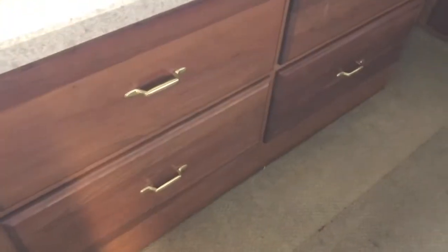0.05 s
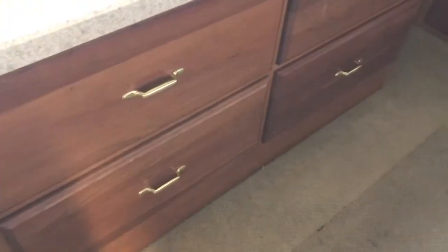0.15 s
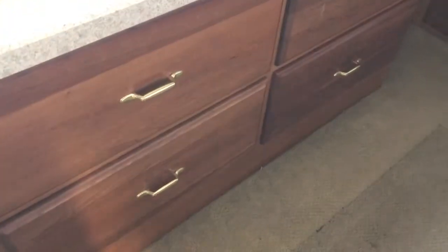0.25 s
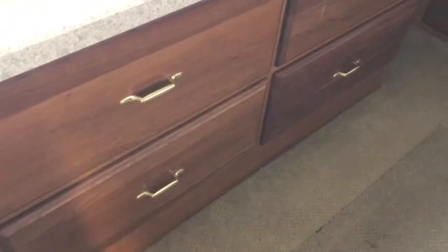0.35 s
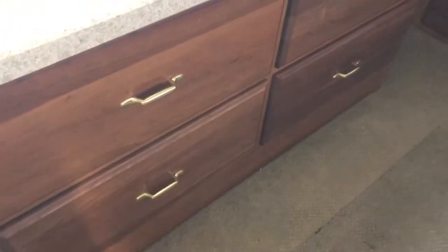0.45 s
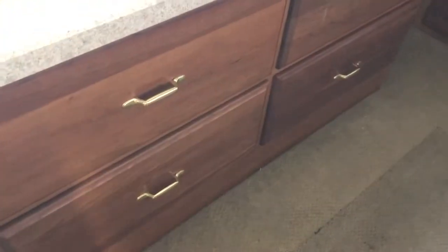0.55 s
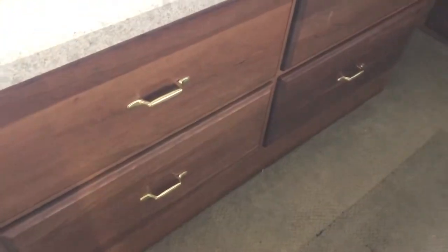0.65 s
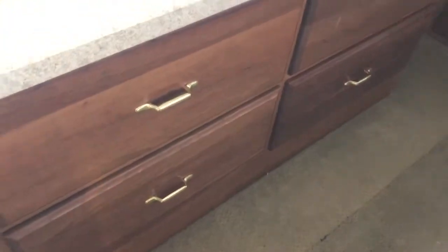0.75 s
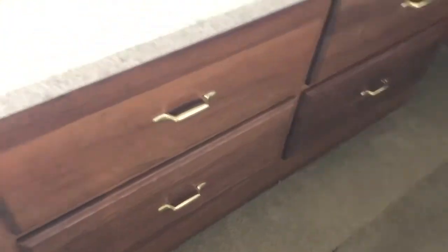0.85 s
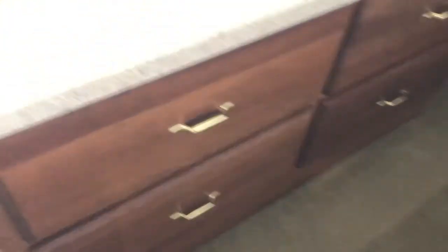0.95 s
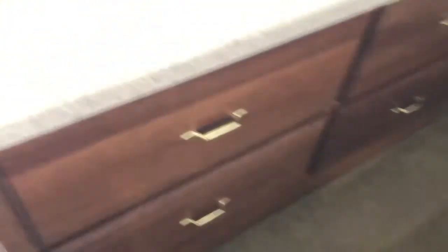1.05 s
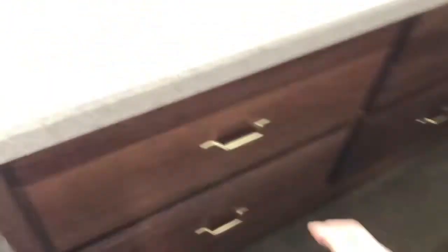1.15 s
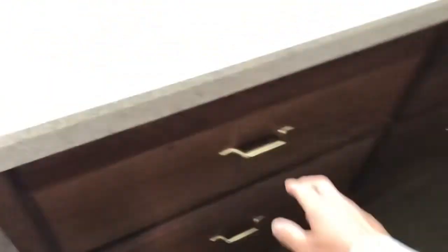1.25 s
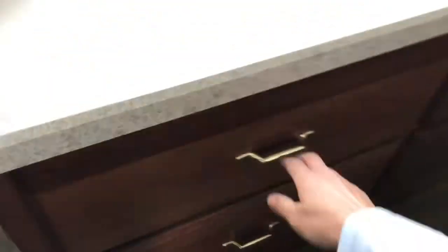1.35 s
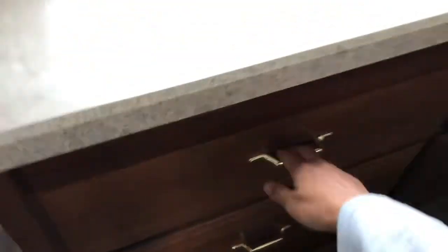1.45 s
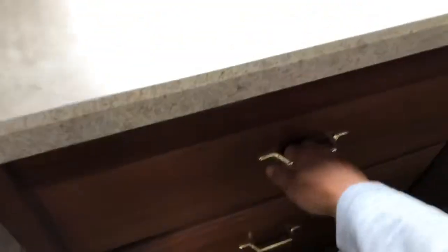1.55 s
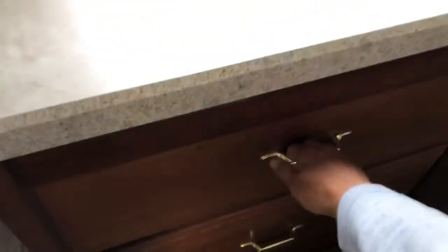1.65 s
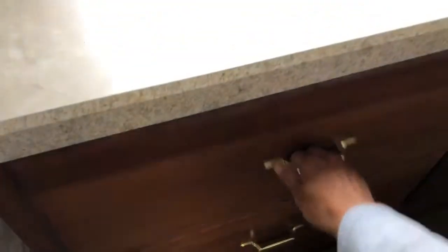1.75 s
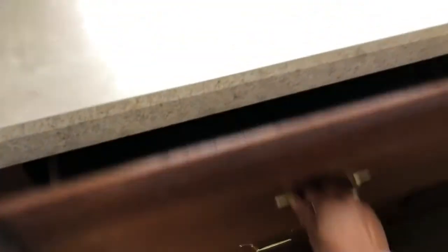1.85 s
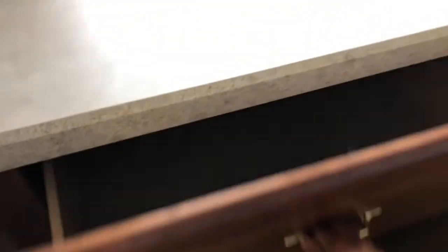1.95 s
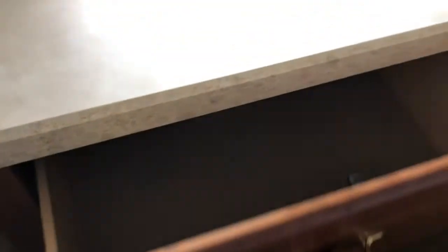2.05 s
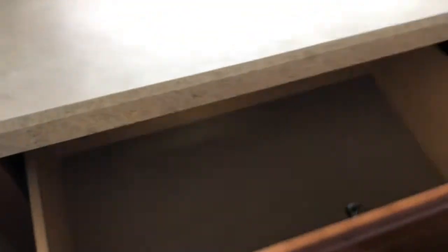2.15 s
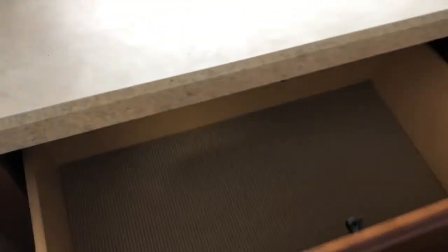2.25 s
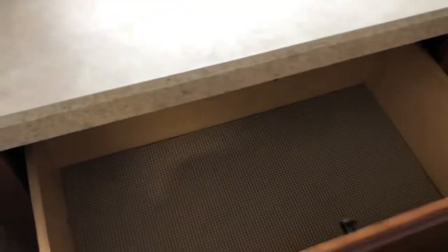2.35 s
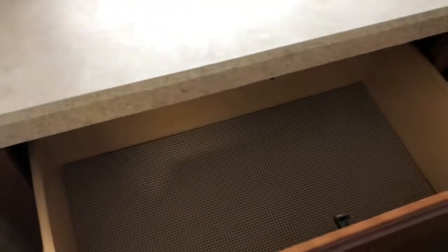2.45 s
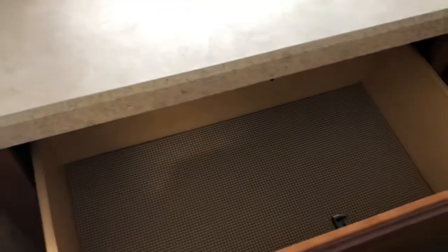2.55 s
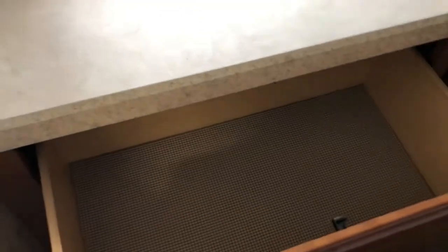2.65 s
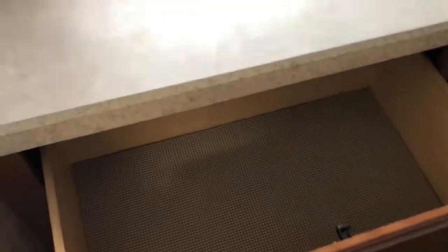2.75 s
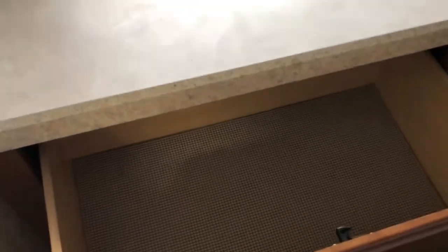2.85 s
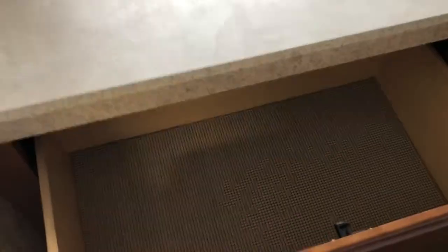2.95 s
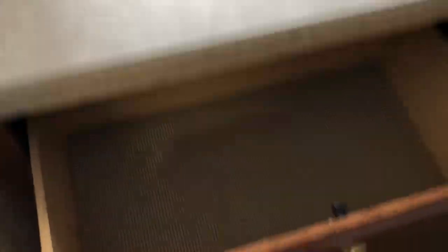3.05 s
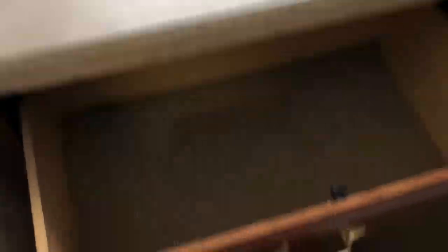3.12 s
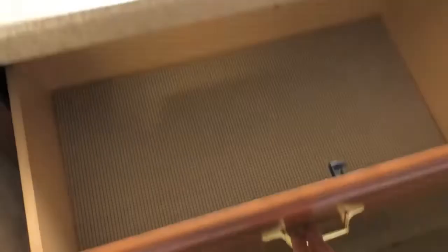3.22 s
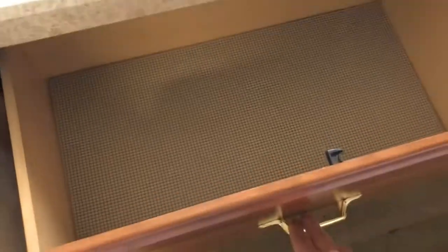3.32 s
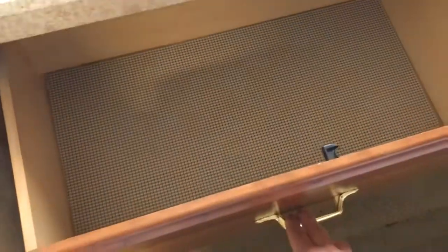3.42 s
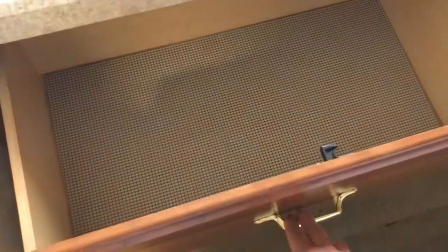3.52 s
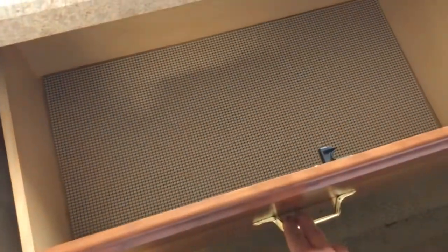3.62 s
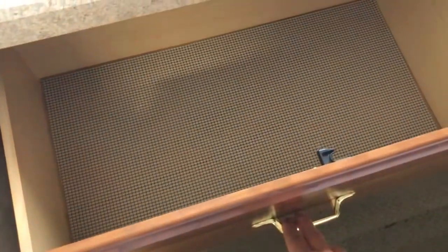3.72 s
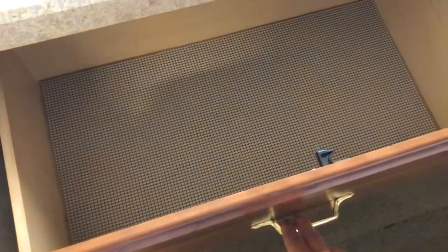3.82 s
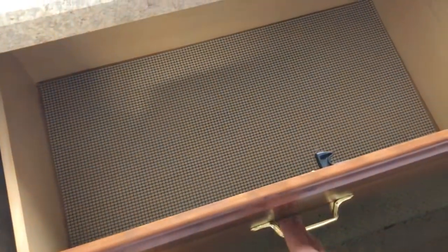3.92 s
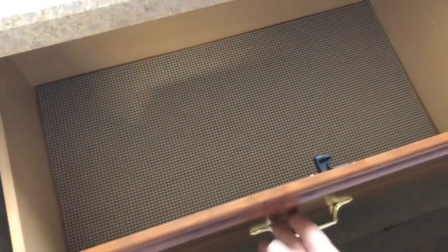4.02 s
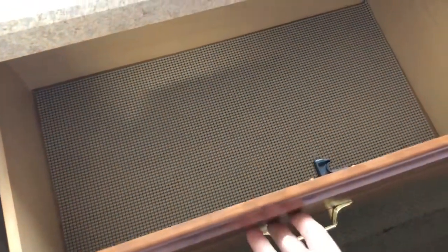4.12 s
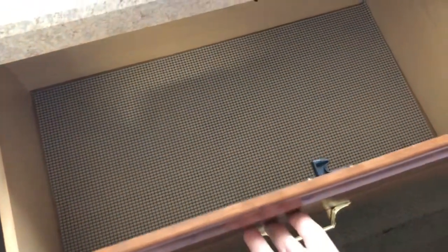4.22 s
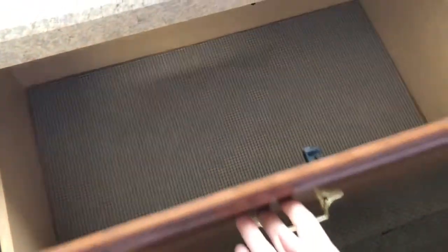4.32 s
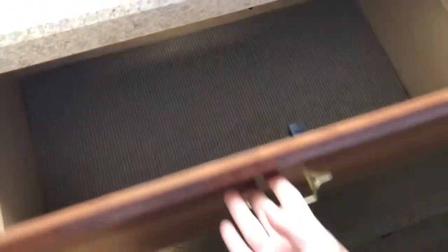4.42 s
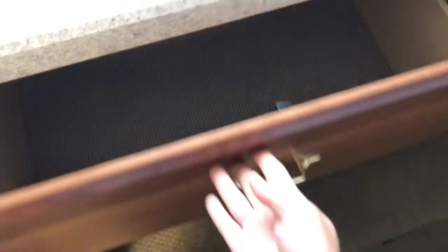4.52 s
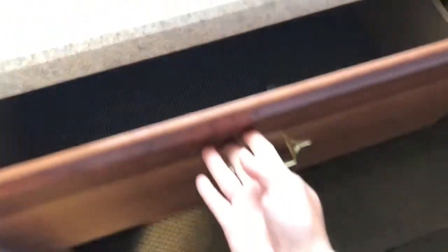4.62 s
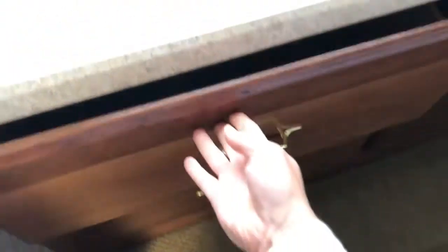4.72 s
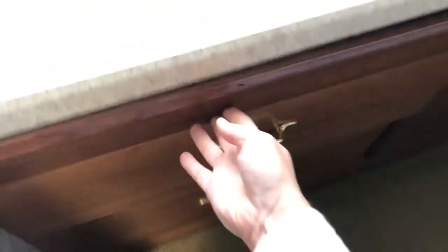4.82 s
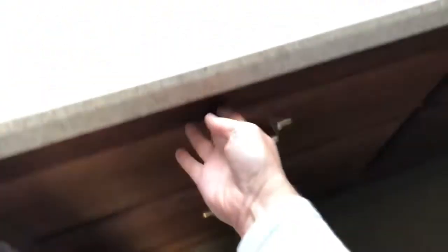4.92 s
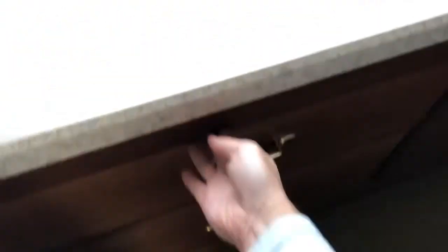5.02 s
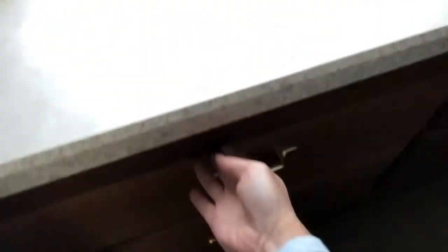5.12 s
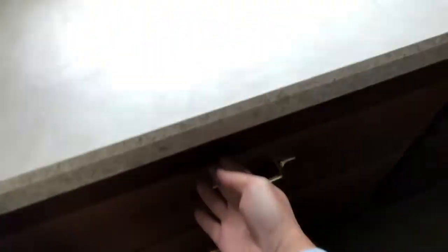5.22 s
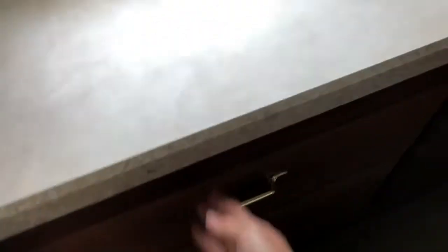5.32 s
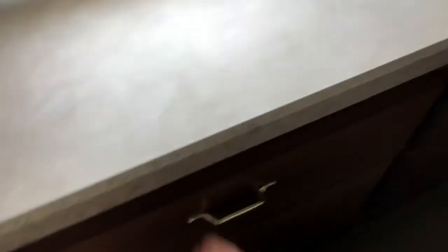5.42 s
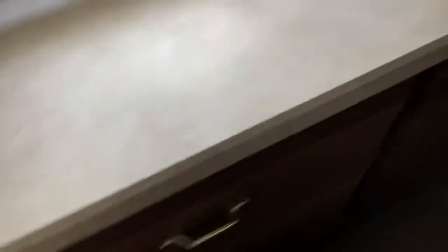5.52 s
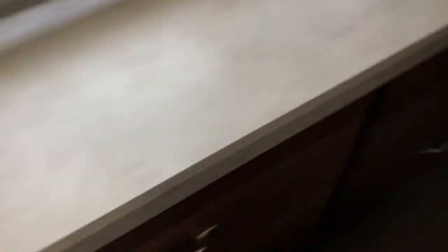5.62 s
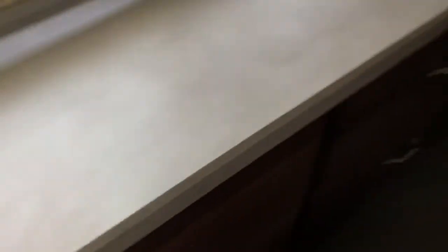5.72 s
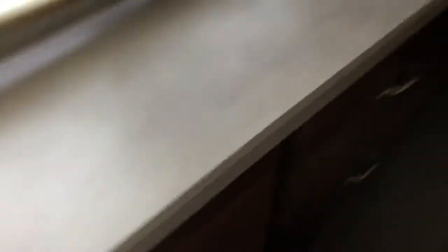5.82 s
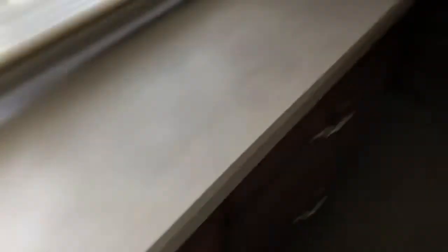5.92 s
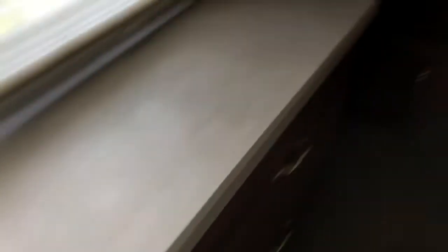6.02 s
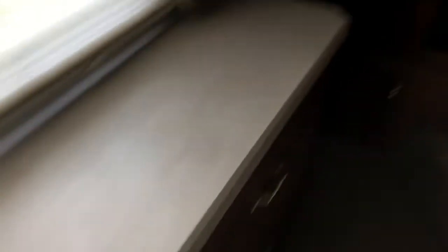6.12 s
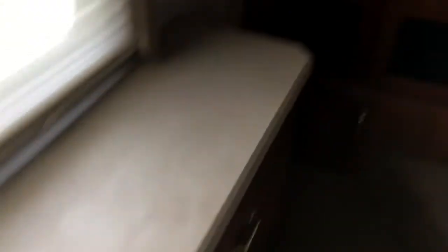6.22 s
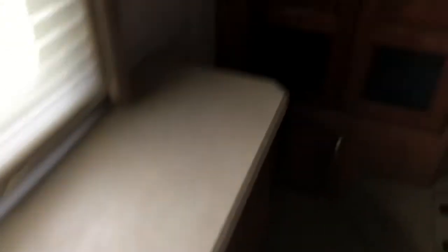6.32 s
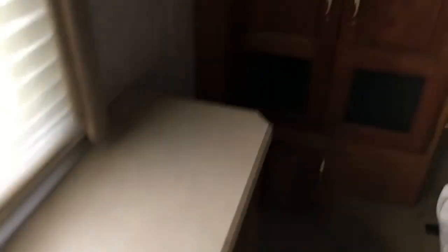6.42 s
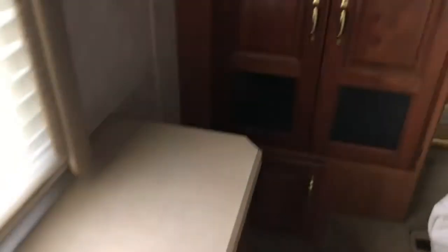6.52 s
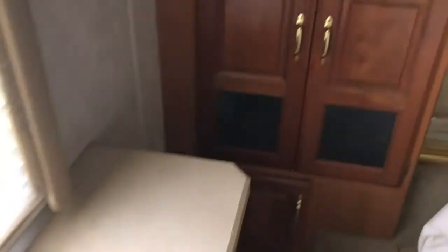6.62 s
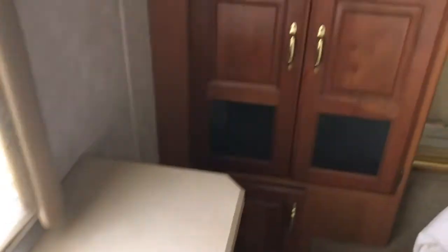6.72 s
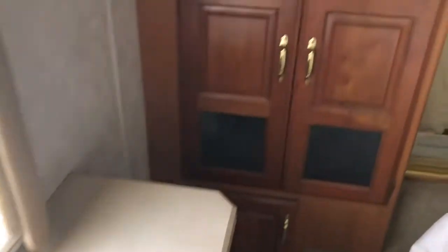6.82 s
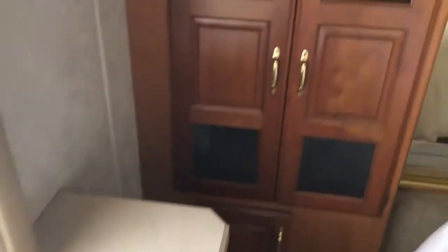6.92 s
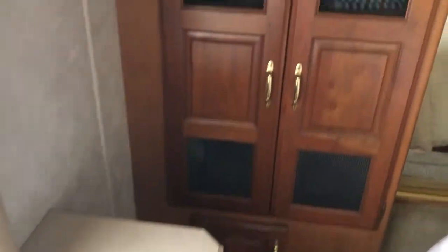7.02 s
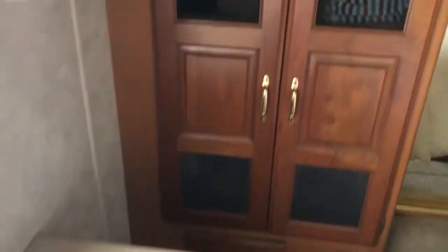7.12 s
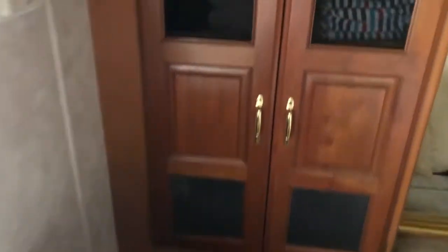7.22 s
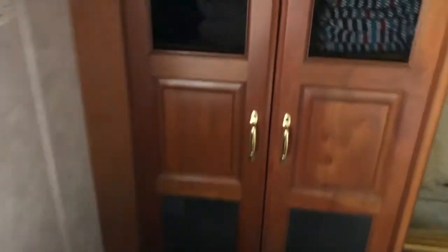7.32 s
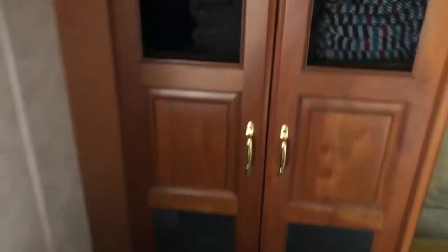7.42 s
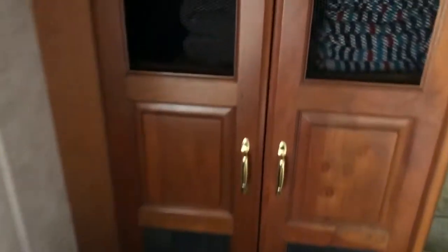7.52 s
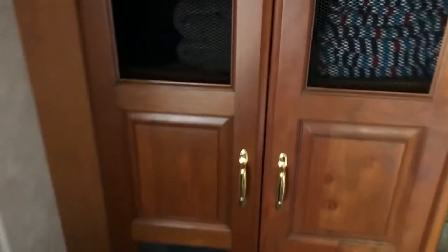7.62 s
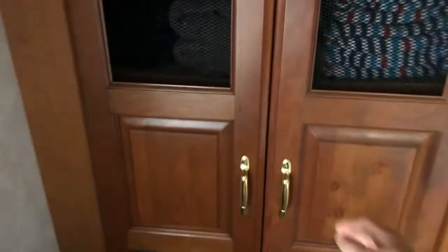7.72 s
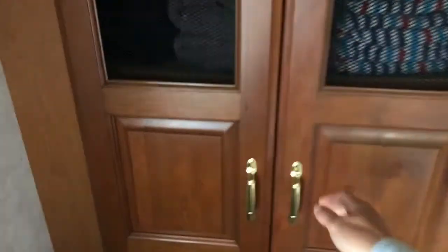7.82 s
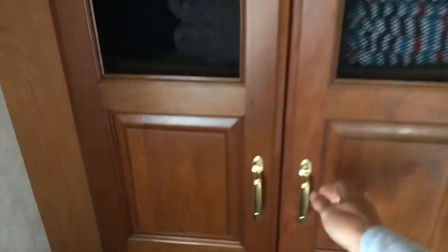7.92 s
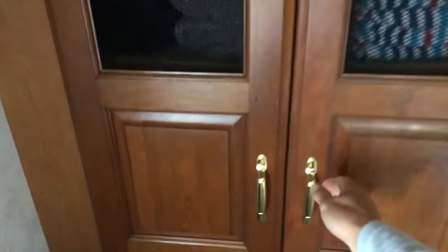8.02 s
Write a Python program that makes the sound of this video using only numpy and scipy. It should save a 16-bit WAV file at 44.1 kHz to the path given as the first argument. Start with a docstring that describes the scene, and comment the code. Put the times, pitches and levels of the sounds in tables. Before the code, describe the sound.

Cloth rustles softly as a wooden drawer rolls open with clicks and clacks, hits its stop, and later rolls back and slams home loudly.

```python
"""In the small, quiet cabin of a parked motorhome, a wooden drawer is tugged from its catch, rolls out
on ball runners and hits its stop. Later it is pushed back: the catch snaps, the front knocks on the
frame and the cabinet booms. A person shifts about with rustling clothes. Impacts are bursts of damped
modes with a short echo; rolling, cloth and floor are coloured noise under slowly varying gains."""
import sys
import numpy as np
from scipy import signal
from scipy.fft import rfft, irfft, next_fast_len
from scipy.io import wavfile
from scipy.ndimage import map_coordinates

SR = 44100
rng = np.random.default_rng(int(sys.argv[2]) if len(sys.argv) > 2 else 0)


def wrap_up_sound(samples):
    """Save the sound to the file named by the first command line argument, as 16-bit audio."""
    columns = np.atleast_2d(samples).T
    # keep every value between -1 and 1, then stretch to whole-number steps
    tamed = np.clip(columns, -1, 1)
    steps = np.round(tamed * 32767).astype(np.int16)
    wavfile.write(sys.argv[1], SR, steps)


N = 355446
T = np.arange(int(.7 * SR)) / SR  # time axis of one impact [s]

# swishes of clothing: (peak time [s], half length [s], rub level [dB], hiss level [dB])
SWISHES = [(0.69, .25, -66.5, -89), (0.962, 0.024, -65.5, -63), (1.33, 0.55, -70.5, -67),
           (1.492, 0.068, -65.5, -64.5), (2.82, 0.13, -69.5, -78), (3.22, 0.15, -74.5, -93),
           (4.077, 0.068, -71.5, -68.5), (5.534, 0.075, -67, -68), (5.851, 0.33, -65.5, -74.5),
           (6.146, 0.23, -59, -65), (6.445, 0.066, -66.5, -69.5), (6.976, .04, -74.5, -71),
           (7.24, .055, -67.5, -70), (7.48, .17, -69, -67.5), (8.001, 0.35, -73.5, -68.5)]
# a step across the floor: (start [s], end [s], rumble level [dB], brushing level [dB])
STEP = (0, 0.74, -62, -75)
# shoves that shake the cabinet: (time [s], level [dB], softness corner [Hz], ring length ratio [1])
THUMPS = [(1.716, -31, 54.5, 0.52), (1.806, -22.5, 90.1, 0.4), (2.29, -12.5, 221, .62),
          (2.327, -21, 79.43, 1), (2.41, -27, 197, 1.08), (4.874, -16, 299.4, .35), (4.901, -6, 280, 0.49),
          (4.992, -30, 120.9, 0.99)]
# the drawer rolls out, then back in:
# (start [s], end [s], relative rumble level [dB], relative grit level [dB])
STROKES = [(1.631, 2.3, -41.5, -56.5), (4.234, 4.875, -43, -58)]
# spectrum of the ball runners: (frequency [Hz], relative density [dB per Hz])
RUNNER = [(200, -14), (700, -4), (1300, -5), (2100, 2), (3000, 0.5), (4200, -2.5), (5500, -4), (8000, -10),
          (12000, -13.5), (16000, -23.5)]


def amp(db):
    """Level to gain: 20 dB is a factor of ten in amplitude."""
    return 10 ** (np.asarray(db) / 20)


def unit(x):
    """Normalisation to an effective (rms) value of 1."""
    return x / np.sqrt(np.mean(x ** 2) + 1e-20)


def along(points, hz):
    """Interpolation of (frequency [Hz], value) points on a logarithmic frequency axis."""
    f, v = np.transpose(points)
    return np.interp(np.log(hz + 1), np.log(f), v)


def wobble(rate):
    """Slow random modulation: a smooth curve through rate random knots a second."""
    return map_coordinates(rng.standard_normal(int(N * rate / SR) + 4), [np.arange(N) * rate / SR])


def colour(x, spectrum, tilt_db=0):
    """Linear filtering: x weighted by a spectrum, tilted about 3 kHz [dB per octave], at rms 1."""
    m = next_fast_len(len(x))
    hz = np.fft.rfftfreq(m, 1 / SR)
    octaves = np.log2(np.maximum(hz, 250) / 3000)
    gain = amp(along(spectrum, hz) + tilt_db * octaves)
    return unit(irfft(rfft(x, m) * gain, m)[:len(x)])


def noise(spectrum, size, tilt_db=0):
    """Coloured noise: a random signal of given spectrum and rms 1."""
    return colour(rng.standard_normal(size), spectrum, tilt_db)


def dying(x):
    """Reverberant decay: each frequency fades exponentially at the cabin's own rate."""
    # reverberation of the cabin: (frequency [Hz], t60 [s])
    cabin = [(80, 0.26), (250, .3), (600, 0.29), (2500, 0.17), (7000, 0.22), (10000, .13), (15000, 0.11)]
    hz, t, z = signal.stft(x, SR, nperseg=256)
    fade = amp(-60 * t / along(cabin, hz)[:, None])
    return signal.istft(z * fade, SR, nperseg=256)[1][:len(x)]


def add(track, s, sound):
    """Superposition: mixes a sound into the track from time s."""
    part = track[max(round(s * SR), 0):][:len(sound)]
    part += sound[:len(part)]


def contact(spectrum, tilt_db, t60, echo_db, top_hz=16000, ripple_db=3, snap=0):
    """Impact excitation: dense, quickly damped modes heard as a noise burst, with the cabin's echo."""
    t = T[:SR // 4]
    hz = np.geomspace(80, 18000, 110)
    # each contact point favours other modes; a padded contact lacks the highest ones
    levels = along(spectrum, hz) + ripple_db * rng.standard_normal(len(hz))
    levels = levels - 10 * np.log10(1 + (hz / top_hz) ** 10)
    struck = np.column_stack([hz, levels])
    leading_edge = 1 + snap * np.exp(-t / 0.0022)
    burst = noise(struck, len(t), tilt_db) * amp(-60 * t / t60) * leading_edge
    burst = burst * (1 - np.exp(-t * top_hz / 2))  # a softer contact builds up more slowly
    return burst + amp(echo_db) * dying(noise(struck, len(t), tilt_db))


def ring(modes, cycles):
    """Modal superposition: damped sines (Hz, dB, t60), each building up over some of its own cycles."""
    out = np.zeros(len(T))
    for hz, db, t60 in modes:
        build_up = 1 - np.exp(-T * hz / cycles)
        out += amp(db - 60 * T / t60) * np.sin(2 * np.pi * hz * T) * build_up
    return out


def in_cabin(x, echo_db):
    """Diffuse reverberation: convolution with decaying noise stands for the close walls' echo."""
    tail = dying(rng.standard_normal(len(T))) * (1 - np.exp(-T / 0.016))
    echo = signal.fftconvolve(x, tail / np.linalg.norm(tail))[:len(x)]
    return x + amp(echo_db) * echo


def resonate(x, body):
    """Resonant transmission: x passes a body whose resonances (Hz, width Hz, lift dB) ring along."""
    m = next_fast_len(N + SR)
    f = np.fft.rfftfreq(m, 1 / SR)
    lift = sum((amp(db) - 1) * 1j * f * w / (hz * hz - f * f + 1j * f * w) for hz, w, db in body)
    return irfft(rfft(x, m) * (1 + lift), m)[:N]


def boxed(x):
    """Resonance and early reflection: the drawer box colours x and the nearest surfaces mirror it."""
    # resonances of the drawer box: (frequency [Hz], width [Hz], lift [dB])
    box_modes = [(252, 15, 5.5), (717, 50, 2.5), (870, 16, -1), (1090, 110, 5.5), (1230, 90, -1.5),
                 (1660, 80, 2.5), (2070, 200, 1), (3060, 120, -0.5), (4100, 87, 5), (4370, 43, 4),
                 (6600, 380, -2), (8760, 1300, 1)]
    # reflections off counter and drawer walls: (delay [s], level [dB])
    nearby = [(.0021, -16), (.0033, -16), (.0052, -15)]
    direct = resonate(x, box_modes)
    out = direct.copy()
    for delay, db in nearby:
        add(out, delay, amp(db) * direct)
    return out


def held(start, end, attack_s, release_s, sag_db_per_s=0):
    """Exponential envelope: rises to start, sags until end, fades; attack and release each span 20 dB."""
    t = np.arange(N) / SR
    outside = np.maximum(start - t, 0) / attack_s + np.maximum(t - end, 0) / release_s
    return amp(-20 * outside - sag_db_per_s * np.clip(t - start, 0, end - start))


def swell(s, half_s):
    """Symmetric envelope: swells to a rounded peak at time s and ebbs alike."""
    return np.exp(-(np.abs(np.arange(N) / SR - s) / half_s) ** 1.5)


def together(levels):
    """Energy addition: the gain of uncorrelated sounds heard at once."""
    return np.sqrt(sum(level ** 2 for level in levels))


def rubbing():
    """Energy addition of the rub of all the person's moves."""
    return together(amp(db) * swell(s, half_s) for s, half_s, db, _ in SWISHES)


def clothes():
    """Friction noise: cloth rubs dully and hisses brightly with each move, over a faint steady bed."""
    # spectra of rub and hiss: (frequency [Hz], relative density [dB per Hz])
    rub_spectrum = [(60, -24.5), (150, -11.5), (300, -0.5), (450, -3.5), (850, -7), (1500, -13),
                    (3000, -17.5), (6000, -26.5), (12000, -44.5)]
    hiss_spectrum = [(800, -18), (2000, -5), (4000, 0), (8000, -2.5), (12000, -5), (16000, -9)]
    still_rub_db, still_hiss_db = -72.5, -78.5  # when nobody moves
    hissing = together(amp(db) * swell(s, half_s) for s, half_s, _, db in SWISHES)
    rub = together([rubbing(), amp(still_rub_db)]) * amp(0.32 * wobble(25)) * noise(rub_spectrum, N)
    hiss = together([hissing, amp(still_hiss_db)]) * amp(0.87 * wobble(35)) * noise(hiss_spectrum, N)
    return rub + hiss


def step_gain():
    """Envelope shared by the step's brushing and its rumble."""
    start, end, _, _ = STEP
    return held(start, end, attack_s=.1, release_s=0.067)


def brushing():
    """Friction noise: a step brushes across the floor in a band about 2 to 3 kHz."""
    _, _, _, brush_db = STEP
    spectrum = [(1000, -11.5), (1800, -4.0), (2800, -2), (3800, -13.0), (8000, -22.5)]  # (Hz, dB per Hz)
    return amp(brush_db) * step_gain() * noise(spectrum, N)


def floor_rumble():
    """Structure-borne noise: the floor rumbles with steps and moves, and on after each shove."""
    # spectrum of the floor: (frequency [Hz], relative density [dB per Hz])
    floor_spectrum = [(20, -24.5), (35, -8), (52, 1), (90, -2), (140, -7.5), (250, -13.5), (500, -31.5),
                      (2000, -56.5)]
    still_db = -69.5  # when nobody moves
    shake_db, shake_fade_s = -42.5, .65  # level against the shove, time to fall 20 dB
    lean_db = -7.5  # rumble of a move against its cloth rub
    _, _, step_db, _ = STEP
    shake = together(amp(db + shake_db) * held(s, s, .01, shake_fade_s) for s, db, _, _ in THUMPS)
    rumble = together([amp(still_db), amp(step_db) * step_gain(), amp(lean_db) * rubbing(), shake])
    return rumble * amp(1.3 * wobble(5.8)) * noise(floor_spectrum, N)


def taps():
    """Impact excitation: handle and furniture answer small taps in one log-frequency hump each."""
    # taps: (time [s], level [dB], centre [Hz], focus [dB per octave squared])
    tap_rows = [(0.343, -53.5, 575, 29), (1.002, -49, 6940, 27), (1.007, -51, 840, 3.5),
                (1.607, -49, 1490, 10), (2.805, -46.5, 976, 12), (2.866, -54, 7070, 0.5),
                (2.885, -51, 874, 6), (2.898, -53.5, 1340, 6), (2.8985, -58.5, 3700, 36),
                (3.835, -56, 599, 11), (6.464, -56.5, 1500, 1.5), (6.964, -60, 638, 17.5),
                (7.22, -62.5, 1200, 1), (7.461, -50.5, 3410, 10), (7.511, -51, 850, 1.5)]
    out = np.zeros(N)
    grid = np.geomspace(50, SR / 2, 40)
    for s, db, centre_hz, focus_db in tap_rows:
        hump = np.column_stack([grid, -focus_db * np.log2(grid / centre_hz) ** 2])
        add(out, s, amp(db) * contact(hump, 0, t60=0.021, echo_db=-11.5))
    return boxed(out)


def footfall():
    """Modal excitation: a foot thuds and sets the floorboards ringing."""
    # footfall: (time [s], level [dB])
    feet = [(0.348, -35.5)]
    # floor modes: (frequency [Hz], level [dB], t60 [s])
    boards = [(51.5, 1.5, 0.22), (84, 2, 0.17), (154.5, -3, 0.045)]
    out = np.zeros(N)
    for s, db in feet:
        add(out, s, amp(db) * ring(boards, cycles=0.52))
    return out


def grip():
    """Friction noise: fingers close round the handle and rub a dull rumble out of the drawer front."""
    # fingers on the handle: (start [s], end [s], level [dB])
    hold = (1.472, 1.6, -52)
    start, end, db = hold
    press = amp(db) * held(start, end, attack_s=.025, release_s=.045, sag_db_per_s=57)
    spectrum = [(50, -25.0), (100, -2.5), (160, 1.5), (230, -7),
                (400, -19.5), (1200, -29.0), (4000, -40.5)]  # (Hz, dB per Hz)
    return press * noise(spectrum, N)


def faint_ticks():
    """Random point process: lesser clicks, strongest in mid-stroke where the drawer is fastest."""
    rate_per_s, mid_db, spread_db = 26, -48.5, 3
    edge_db = 21.5  # drop towards the ends of a stroke
    rows = []
    for start, end, _, _ in STROKES:
        for k, (slip, size) in enumerate(rng.uniform(-1, 1, (40, 2))):
            s = start + (k + 1 + slip / 2) / rate_per_s
            edge = (2 * (s - start) / (end - start) - 1) ** 2
            if s < end:
                rows.append((s, mid_db + spread_db * size - edge_db * edge))
    return rows


def opening(s):
    """Kinematics: how far the drawer is out at time s, from 0 to 1."""
    return np.interp(s, [t for stroke in STROKES for t in stroke[:2]], [0, 1, 1, 0])


def ball_clicks():
    """Impact excitation: balls click against their cage, brighter as the runners leave the cabinet."""
    # the clearest clicks: (time [s], relative level [dB])
    ticks = [(1.6235, -40), (1.6924, -39), (1.828, -44), (1.8625, -40), (1.951, -44), (1.958, -42.5),
             (1.971, -44.5), (2.016, -46.5), (2.0535, -38.5), (2.0863, -40), (2.1307, -43), (2.1794, -39.5),
             (2.2037, -39.5), (2.225, -35), (4.340, -40), (4.389, -43), (4.405, -45), (4.427, -42),
             (4.4867, -38), (4.5283, -38), (4.563, -42), (4.592, -40.5), (4.6201, -40), (4.629, -44.5),
             (4.689, -44)]
    shut_tilt_db, open_tilt_db = 0.5, 4.5  # dB per octave
    out = np.zeros(N)
    for s, db in ticks + faint_ticks():
        tilt_db = shut_tilt_db + (open_tilt_db - shut_tilt_db) * opening(s)
        click = contact(RUNNER, tilt_db, t60=0.068, echo_db=-13.5, top_hz=15500, snap=0.46)
        add(out, s, amp(db - 3.5) * click)
    return boxed(out)


def clacks():
    """Impact excitation: the wobbling drawer clacks against its runners."""
    # clacks: (time [s], level [dB])
    clack_rows = [(1.6262, -41), (1.6427, -38), (1.684, -42.5), (1.7051, -37), (1.7984, -39.5),
                  (1.8627, -37), (1.899, -46), (1.929, -38.5), (2.0665, -44), (4.2225, -44), (4.272, -44),
                  (4.6896, -43), (4.697, -40), (4.749, -50), (4.782, -49.5), (4.7928, -39.5)]
    # their spectrum: (frequency [Hz], relative density [dB per Hz])
    clack_spectrum = [(200, -14), (700, -1.5), (1400, 0.5), (2300, 1), (4000, -11), (8000, -22.5),
                      (16000, -38)]
    out = np.zeros(N)
    for s, db in clack_rows:
        add(out, s, amp(db) * contact(clack_spectrum, 0, t60=0.032, echo_db=-12.5))
    return boxed(out)


def rolling():
    """Rolling noise: the box rumbles and balls grind over fine grit, harder where the runners bind."""
    # the runners bind and scrape under load: (time [s], half length [s], relative grit level [dB])
    binds = [(1.705, 0.023, -50), (1.809, 0.049, -52.5), (2.25, 0.02, -41.5), (4.264, 0.0316, -50.5),
             (4.5, 0.061, -55.5)]
    # spectrum of the rumble: (frequency [Hz], relative density [dB per Hz])
    roll_spectrum = [(30, -14.5), (50, 2.5), (75, -7.5), (125, 1), (190, -2.5), (270, -5.5), (330, -13.5),
                     (580, -19), (750, -14.5), (900, -20), (1400, -29.5), (3000, -51.5)]
    # the drawer's bottom drums along: (frequency [Hz], width [Hz], lift [dB])
    drum = [(135, 40, 1), (184, 10, 2), (260, 21, 3.5), (753, 60, 5)]
    start_s, stop_s = 0.026, .1  # rise and fall times over 20 dB
    rumble_sag, grit_sag = 5.5, 6.5  # the hand eases off along a stroke [dB per s]
    bind_rumble_db = 9.5  # rumble of a bind over its grit
    bind = together(amp(db) * swell(s, half_s) for s, half_s, db in binds)
    rumble = sum(amp(db) * held(start, end, start_s, stop_s, rumble_sag) for start, end, db, _ in STROKES)
    grit = sum(amp(db) * held(start, end, start_s, stop_s, grit_sag) for start, end, _, db in STROKES)
    grains = (rng.random(N) < 500 / SR) * rng.standard_normal(N)  # about 500 a second
    grinding = unit(colour(grains, RUNNER) + noise(RUNNER, N))
    low = together([rumble, amp(bind_rumble_db) * bind]) * noise(roll_spectrum, N) * amp(1.8 * wobble(26))
    high = together([grit, bind]) * grinding * amp(0.96 * wobble(38))
    return amp(-1) * (resonate(low, drum) + boxed(high))


def bottom_hum():
    """Plate modes: jolts set the open drawer's thin bottom humming."""
    # jolts: (time [s], level [dB])
    jolts = [(1.655, -42.5), (2.236, -39.5), (2.325, -27.5), (2.408, -40.5), (2.75, -57), (2.806, -50.5),
             (2.884, -56)]
    # modes of the bottom: (frequency [Hz], level [dB], t60 [s])
    bottom = [(180, -10, 0.3), (267, 3.5, 0.22), (320, -11.5, 0.37)]
    out = np.zeros(N)
    for s, db in jolts:
        add(out, s, amp(db) * in_cabin(ring(bottom, cycles=1), echo_db=-12.5))
    return out


def cabinet_boom():
    """Low-order modal response: the heavy cabinet booms under each shove."""
    # modes of the cabinet: (frequency [Hz], level [dB], t60 [s])
    cabinet = [(54.25, -11, 0.48), (78.5, -1.5, 0.41), (120.7, 1.5, 0.12), (133.5, -1, 0.2),
               (160, -6, 0.093), (238, -12.5, 0.31), (393, -9, 0.15)]
    out = np.zeros(N)
    for s, db, corner_hz, length in THUMPS:
        # a soft shove reaches only the lowest modes; a hand on the wood shortens their ring
        modes = [(hz, level - 10 * np.log10(1 + (hz / corner_hz) ** 4), t60 * length)
                 for hz, level, t60 in cabinet]
        add(out, s, amp(db) * in_cabin(ring(modes, cycles=0.46), echo_db=-12.0))
    return out


def snaps():
    """Impact excitation: the catch and the stop snap with a short, narrow-band crack."""
    # snaps: (time [s], level [dB])
    snap_rows = [(1.745, -28), (1.7533, -22), (2.2712, -22.5), (2.282, -21), (4.863, -28), (4.882, -4),
                 (4.888, -17)]
    # their spectrum: (frequency [Hz], relative density [dB per Hz])
    catch = [(1000, -26), (1600, -16), (2000, 2), (2500, -21.5), (5500, -22), (7000, -7), (8200, 2.5),
             (9500, -16.5), (16000, -24)]
    out = np.zeros(N)
    for s, db in snap_rows:
        add(out, s, amp(db) * contact(catch, 0, t60=.011, echo_db=-31, ripple_db=1.5))
    return out


def rebounds(first_s, count):
    """Inelastic rebound: (number, delay [s]) of contacts that follow each other ever faster."""
    shrink = .85  # each flight time over the one before
    return [(k, first_s * np.sum(shrink ** np.arange(k))) for k in range(count)]


def slams():
    """Inelastic impact: wood strikes catch, stop or frame and chatters in ever faster rebounds."""
    # slams: (time [s], relative level [dB], tilt of first contact [dB per octave], top [Hz],
    # first rebound [s], loss per rebound [dB])
    slam_rows = [(1.748, -29.5, -0.5, 9210, 0.0062, 1.5), (1.7531, -24, -0.5, 14580, 0.046, 15.5),
                 (2.2712, -14, 3.5, 14500, .0061, 4), (2.3371, -33, 1, 10040, .028, 9),
                 (2.406, -28, 2.5, 8350, .035, 17), (4.868, -35, -0.5, 7025, 0.0041, 9),
                 (4.882, -20.5, -1.5, 14500, .012, 2)]
    # spectrum of struck wood: (frequency [Hz], relative density [dB per Hz])
    wood_spectrum = [(100, -12), (300, 0.5), (800, 0.5), (1200, -3.5), (2000, 0.5), (3000, 1), (4100, -3),
                     (5200, -7.5), (7500, -4.5), (9500, -10.5), (13000, -11), (16000, -23.5)]
    rebound_tilt_db = -2.1  # rebounds are dull, wood on wood [dB per octave]
    out = np.zeros(N)
    for s, db, first_tilt_db, top_hz, first_s, loss_db in slam_rows:
        for k, delay in rebounds(first_s, count=5):
            tilt_db = rebound_tilt_db if k else first_tilt_db
            crack = contact(wood_spectrum, tilt_db, t60=0.04, echo_db=-11.0, top_hz=top_hz, ripple_db=2.0)
            add(out, s + delay, amp(db + 2.5 - k * loss_db) * crack)
    return boxed(out)


def panel_knocks():
    """Plate modes: the drawer's thin panels ring when knocked, each knock at its own pitch ratio."""
    # knocks: (time [s], level [dB], pitch ratio [1])
    knocks = [(1.7577, -18.5, .97), (2.2765, -15, 1.02), (2.294, -19.5, 0.91), (2.408, -32.5, 1.08),
              (4.868, -22.5, .95), (4.883, -22, .9), (4.8919, -10.5, 1.01)]
    # modes of the panels: (frequency before the pitch ratio [Hz], level [dB], t60 [s])
    panel = [(270, -9, .16), (390, -13, .12), (525, -5, .075), (635, 0, .085), (725, -9, .08),
             (820, -11, .09)]
    out = np.zeros(N)
    for s, db, ratio in knocks:
        modes = [(hz * ratio, level, t60) for hz, level, t60 in panel]
        add(out, s, amp(db) * in_cabin(ring(modes, cycles=0.18), echo_db=-25))
    return out


def rail():
    """Narrow-band tone: one steel rail sings, a little unsteadily, as it is drawn out."""
    level = amp(-47.5) * held(1.78, 2.05, attack_s=.1, release_s=.15, sag_db_per_s=30)
    pitch_hz = 1603 + 18 * wobble(110)
    return level * np.sin(2 * np.pi * np.cumsum(pitch_hz) / SR) * amp(2 * wobble(40))


def scene():
    """Superposition: all sources add at one close microphone."""
    person = clothes() + brushing() + floor_rumble() + footfall() + grip()
    runners = ball_clicks() + clacks() + rolling() + rail()
    blows = bottom_hum() + cabinet_boom() + snaps() + slams() + panel_knocks()
    return (person + taps() + runners + blows)[None]


def record(dry):
    """Band limitation: the deepest bass is shed and nothing passes from 16.2 kHz up."""
    m = next_fast_len(N + SR)
    hz = np.fft.rfftfreq(m, 1 / SR)
    low_cut = 1 - 1 / (1 + (hz / 36) ** 6)
    return irfft(rfft(dry, m) * low_cut * (hz < 16200), m)[..., :N]


dry = scene()
out = record(dry)
wrap_up_sound(out)
```